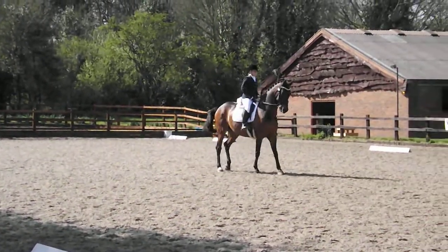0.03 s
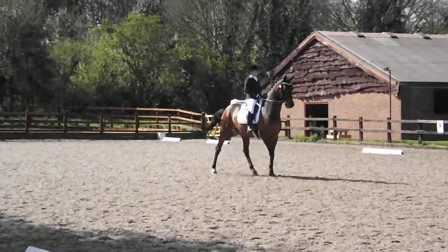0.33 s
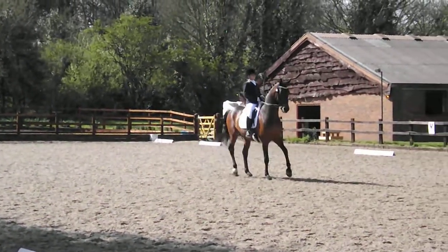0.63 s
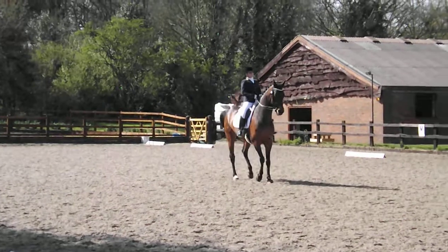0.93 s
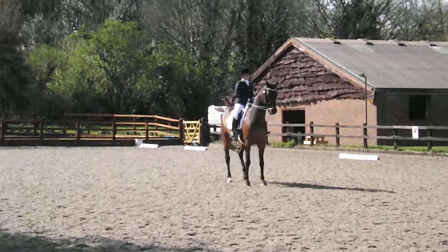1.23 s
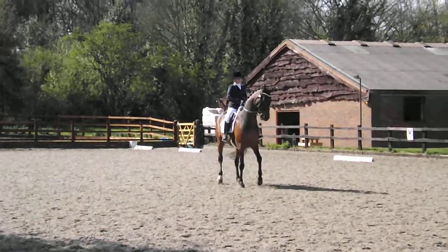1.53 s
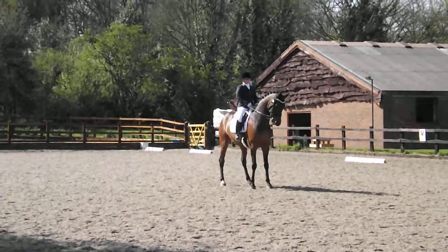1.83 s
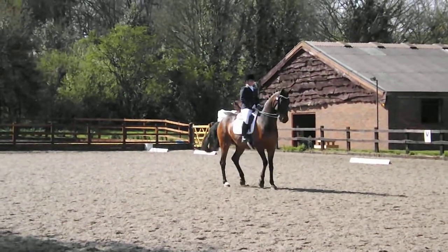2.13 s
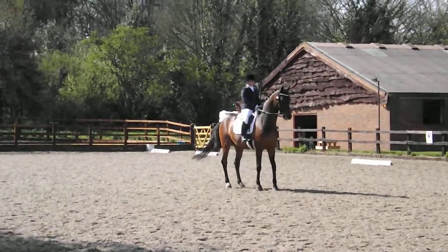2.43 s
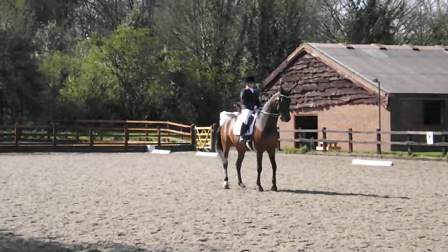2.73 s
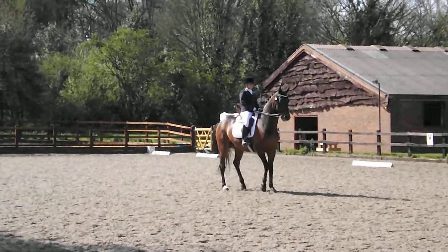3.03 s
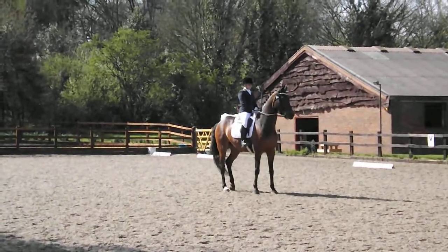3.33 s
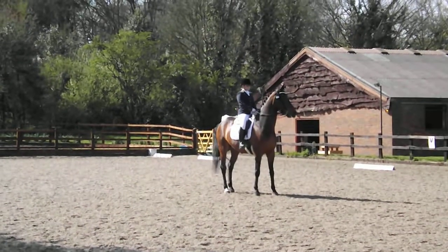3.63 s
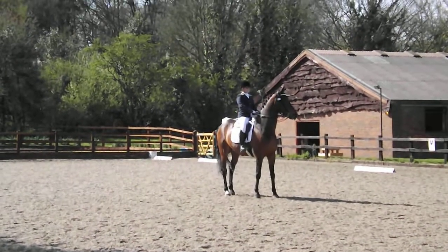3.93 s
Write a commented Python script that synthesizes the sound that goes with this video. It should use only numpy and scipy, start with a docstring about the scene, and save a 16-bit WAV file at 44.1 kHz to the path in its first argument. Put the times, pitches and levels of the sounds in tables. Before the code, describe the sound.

Gusty wind rumbles on the microphone over chirping birds, distant traffic and soft hoof scuffs.

```python
"""An outdoor riding arena edged by trees, on a breezy day; one microphone, out in the wind.
Far traffic and leaves wash on throughout. Small birds chirp in the trees from the start, a distant one
clacks in short runs, thin whistles fall, and a walking horse begins to scuff the sand. Gusts then buffet
the microphone, hardest around two seconds in, with a faint far call before the peak and a tick after it.
As the wind eases the far call comes again, and a run of twitters and a few squeaks close the scene."""
import sys
import numpy as np
from scipy import signal
from scipy.fft import rfft, irfft
from scipy.io import wavfile
from scipy.ndimage import uniform_filter1d

SR = 44100
rng = np.random.default_rng(int(sys.argv[2]) if len(sys.argv) > 2 else 0)


def store_wav(level_fs):
    """Save 16-bit WAV to argv[1]."""
    pcm = np.round(np.clip(np.atleast_2d(level_fs), -1, 1) * 32767)
    wavfile.write(sys.argv[1], SR, pcm.T.astype(np.int16))


N = 176400
TIME = np.arange(N) / SR

# Levels are relative within each table; spectra give level per hertz.
# wind pressure on the microphone: t/s, level/dB
GUST_LEVELS = [(0.0, -38), (0.17, -30.5), (0.33, -34), (0.67, -21.5), (0.69, -16), (0.83, -31),
               (1.01, -22.5), (1.04, -27), (1.2, -21.5), (1.24, -16.5), (1.32, -20), (1.64, -10),
               (1.71, -19), (1.77, -8.5), (1.87, -18.5), (1.92, -10), (2.02, -27), (2.05, -14.5),
               (2.1, -26), (2.15, -14), (2.22, -18.5), (2.27, -16.5), (2.39, -17.5), (2.43, -14.5),
               (2.53, -12), (2.61, -21.5), (2.71, -27), (2.87, -18.5), (2.93, -25), (3.03, -23.5),
               (3.63, -27), (3.97, -22.5), (4.0, -35)]
# rumble of that wind: f/Hz, level/dB
RUMBLE_SPECTRUM = [(10, -2.5), (16, 5), (30, 2.5), (52, -0.5), (80, -8.5), (120, -23.5), (170, -27),
                   (250, -42), (400, -76), (1000, -95), (4000, -130)]
# far traffic and leaves: f/Hz, level/dB
WASH_SPECTRUM = [(20, -2.5), (60, 16), (125, 5.5), (180, -2.5), (280, -8), (400, -5), (700, -7),
                 (1150, -10.5), (1750, -6.5), (1920, -14), (2080, -9), (2600, -15), (3300, -13.5),
                 (3750, -18.5), (4150, -12.5), (4500, -24), (5600, -31.5), (7500, -32), (10000, -34.5),
                 (15500, -36.5)]
# droning bands in the background: f/Hz, width/Hz, level/dB
BACKGROUND_DRONES = [(120, 14.8, -42), (238.5, 64, -53.5), (294.5, 17.6, -57.5), (354.6, 46, -53),
                     (469, 12.7, -56.5), (593.3, 25, -60), (882, 5.9, -65.5), (1502, 10.5, -60.5)]
# rising chirps in the trees: t/s, length/s, start f/Hz, end f/Hz, level/dB
RISING_CHIRPS = [(0.033, 0.035, 2750, 4190, -30), (.132, 0.024, 5050, 5800, -51),
                 (0.15, 0.033, 4130, 4960, -39.5), (0.208, 0.024, 3080, 3930, -36),
                 (0.266, 0.021, 4400, 5680, -43.5), (2.233, 0.059, 3050, 3340, -39.5),
                 (2.52, 0.021, 3220, 4070, -37.5), (2.53, .025, 5030, 5600, -53),
                 (2.55, 0.018, 4300, 4850, -56), (2.565, 0.022, 3127, 3620, -34),
                 (2.626, 0.037, 3110, 4170, -34), (2.716, .024, 4080, 5140, -43),
                 (2.846, 0.011, 3430, 4180, -35), (2.869, 0.041, 3275, 3664, -35.5),
                 (2.917, 0.0235, 3500, 4450, -41), (2.931, 0.042, 3180, 4030, -35),
                 (2.95, 0.029, 5130, 5650, -51), (2.968, .025, 3930, 4750, -46),
                 (3.043, 0.035, 3074, 4170, -30.5), (3.126, .028, 3550, 5180, -39),
                 (3.157, 0.032, 3040, 3436, -37)]
# twitters, each the same run of upsweeps: t/s, level/dB
TWITTER_ONSETS = [(3.273, -27.5), (3.391, -28), (3.503, -27.5), (3.614, -28), (3.732, -28.5)]
# upsweeps of one twitter: delay/s, length/s, start f/Hz, end f/Hz, level/dB
TWITTER_SWEEPS = [(0, 0.0173, 3015, 4514, -5.5), (0.02, 0.0098, 3060, 4110, -8),
                  (.027, .014, 4500, 5200, -14), (0.044, 0.015, 4660, 6700, -23)]
# dry clacks of a distant bird: t/s, level/dB, centre f/Hz
BIRD_CLACKS = [(0.223, -35, 1300), (0.328, -32, 1230), (0.417, -30.5, 1260), (0.532, -32, 1200),
               (0.643, -32, 1200), (1.071, -31.5, 1200), (1.163, -30, 1200), (1.275, -26, 1140),
               (1.335, -28.5, 1150), (3.339, -31, 1170), (3.445, -28.5, 1265), (3.536, -30.5, 1500),
               (3.649, -30.5, 1200)]
# colour of one clack: f/centre f, level/dB
CLACK_SPECTRUM = [(.42, -7), (.75, -5), (1, 2), (1.4, -3.5), (1.95, -5.5), (2.7, -27), (5, -29), (10, -60)]
# falling whistles: t/s, length/s, level/dB, scattered share/0-1, share of the course sung/0-1
FALLING_WHISTLES = [(0.297, 0.066, -54, .2, 0.75), (1.07, .05, -56, .7, 0.94), (1.349, 0.059, -52, .4, .55),
                    (2.118, 0.058, -47, 0.2, 0.93), (2.291, .067, -43, 0.03, 0.95),
                    (3.439, 0.059, -48, 0.5, 0.9), (3.607, 0.057, -44, 0.45, 0.91)]
# full course of a whistle: position/0-1, f/Hz, level/dB
WHISTLE_COURSE = [(0, 7150, -25), (.3, 6470, -10.5), (.55, 6160, -11), (.83, 5880, -0.5), (.93, 5010, 7),
                  (1, 4400, -24)]
# hooves on the arena floor: t/s, hold/s, release/s, hiss level/dB, ring level/dB
HOOF_SCUFFS = [(0.463, 0.16, 0.13, -41.5, -42.5), (0.7, 0.26, 0.09, -48, -50),
               (1.24, 0.18, 0.078, -47, -55), (1.725, 0.11, 0.14, -41, -46.5),
               (2.214, 0.15, 0.44, -46, -50), (2.983, 0.14, 0.045, -44.5, -45)]
# hiss of the sand: f/Hz, level/dB
SAND_SPECTRUM = [(100, -51), (700, -1.5), (1500, -11), (2200, -5), (2800, -3), (3300, -3.5), (3800, -6),
                 (4400, -13.5), (5600, -24), (8000, -39), (14000, -46)]
# sharp buffets right at the microphone: t/s, width/s, level/dB
WIND_BUFFETS = [(.704, .0045, -16), (.713, .0027, -19.5), (1.0, .004, -18), (1.413, .0013, -22),
                (1.624, .004, -16), (1.771, .0032, -13), (1.793, .0014, -18), (1.81, .0025, -21),
                (1.904, .0019, -13), (2.274, .0032, -13.5), (2.375, .0019, -25), (2.427, .0025, -19),
                (2.508, .0021, -14), (2.567, .002, -17.5), (2.587, .0026, -18.5), (2.925, .0012, -27),
                (3.005, .0014, -27), (3.093, .0022, -17), (3.78, .0017, -26), (3.797, .006, -21)]
# faint calls, far off: t/s, f/Hz, level/dB
FAR_NOTES = [(1.245, 750, -45.5), (3.23, 745, -48)]
# squeaks and slurs: t/s, length/s, start f/Hz, end f/Hz, level/dB, roughness/0-1, scattered share/0-1
BIRD_SQUEAKS = [(3.46, .055, 3300, 2850, -43, .08, .5), (3.785, .075, 3200, 4100, -47, .08, .5),
                (3.86, .04, 8400, 8150, -48, .01, .08), (3.866, .04, 6000, 5000, -52, .12, .3),
                (3.877, .06, 6750, 6650, -49.5, .022, .1), (3.892, .013, 6950, 6720, -35, .007, .01),
                (3.899, .027, 8450, 7600, -45, .009, .05), (3.895, .06, 4300, 3950, -42, .12, .5),
                (3.9, .07, 2700, 2500, -46, .1, .4), (3.93, .11, 4100, 3600, -39.5, .12, .5)]


def from_db(db):
    """Decibels to gain."""
    return 10 ** (np.asarray(db) / 20)


def rms_one(x):
    """Scale to unit rms."""
    return x / np.sqrt(np.mean(x ** 2) + 1e-20)


def evened(x, span_s):
    """Hold the running level of a noise at 1."""
    return x / np.sqrt(np.abs(uniform_filter1d(x ** 2, int(span_s * SR))) + 1e-12)


def drift(rate_hz):
    """Smooth random wandering of spread 1."""
    step, settle = 40, 2000
    pole = np.exp(-2 * np.pi * rate_hz * step / SR)
    noise = rng.standard_normal(N // step + settle + 2)
    slow = signal.lfilter([1], [1, -2 * pole, pole ** 2], noise)[settle:]
    return np.interp(np.arange(N) / step, np.arange(len(slow)), rms_one(slow))


def coloured(spectrum, flicker_db=0, size=N):
    """Noise in the colour of a spectrum, rms 1; octaves below about 2 kHz can each flicker."""
    hz, db = np.transpose(spectrum)
    bin_hz = np.maximum(np.arange(size // 2 + 1) * SR / size, 1)
    shaped = rfft(rng.standard_normal(size)) * from_db(np.interp(np.log(bin_hz), np.log(hz), db))
    if not flicker_db:
        return rms_one(irfft(shaped, size))
    octave, out = np.log2(bin_hz).astype(int), np.zeros(size)
    for k in np.unique(octave):
        flicker = from_db(flicker_db * drift(10.4) * (2 ** k < 2000))
        out += flicker * irfft(shaped * (octave == k), size)
    return rms_one(out)


def resonant_noise(hz, width_hz):
    """Noise twice through one resonance, rms 1."""
    radius = np.exp(-np.pi * width_hz / SR)
    x = rng.standard_normal(N + SR // 2)
    for _ in range(2):
        x = signal.lfilter([1, 0, -1], [1, -2 * radius * np.cos(2 * np.pi * hz / SR), radius ** 2], x)
    return rms_one(x[-N:])


def add(out, s, sound):
    """Mix a sound in at a time."""
    i = max(int(s * SR), 0)
    out[i:i + len(sound)] += sound[:max(N - i, 0)]


def wind(split_hz=21.6, brightening=0.082):
    """Eddies on the microphone; the small ones gain in stronger gusts and brighten the rumble."""
    gust_db = np.interp(TIME, *np.transpose(GUST_LEVELS))
    rumble = coloured(RUMBLE_SPECTRUM)
    large = signal.sosfiltfilt(signal.butter(2, split_hz, fs=SR, output="sos"), rumble)
    small = (rumble - large) * from_db(brightening * (gust_db - 24))
    return from_db(gust_db - 1.5) * evened(large + small, span_s=0.07)


def traffic_and_leaves():
    """A far, slightly flickering wash, with steady droning bands."""
    wash = from_db(-37) * coloured(WASH_SPECTRUM, flicker_db=0.83)
    return wash + sum(from_db(db) * resonant_noise(hz, width) for hz, width, db in BACKGROUND_DRONES)


def glide(length, start_hz, end_hz, db, arch, roughness=0.009):
    """A bird's note swells and fades as it sweeps; with arch above 1 the sweep levels off."""
    progress = np.linspace(0, 1, int(length * SR))
    hz = end_hz + (start_hz - end_hz) * (1 - progress) ** arch
    hz *= 1 + roughness * drift(310)[:len(hz)]
    return from_db(db) * np.sin(np.pi * progress) * np.sin(2 * np.pi * np.cumsum(hz) / SR)


def songbirds(flutter_db=1):
    """Slightly hoarse chirps and twitters from the trees at the arena's edge."""
    out = np.zeros(N)
    for s, length, start_hz, end_hz, db in RISING_CHIRPS:
        add(out, s, glide(length, start_hz, end_hz, db, arch=1.31))
    for s, db in TWITTER_ONSETS:
        for delay, length, start_hz, end_hz, sweep_db in TWITTER_SWEEPS:
            add(out, s + delay, glide(length, start_hz, end_hz, db + sweep_db, arch=1.67))
    return out * from_db(-6 + flutter_db * drift(120))


def echo(x, t60_s, delay_s=0):
    """Diffuse echo from trunks, branches and the barn."""
    age = TIME[:SR]
    tail = rng.standard_normal(SR) * from_db(-60 * age / t60_s) * (age > delay_s)
    return signal.fftconvolve(x, tail / np.sqrt(np.sum(tail ** 2)))[:N]


def scattered_by_branches(x, share):
    """A share of the power reaches the microphone smeared by twigs and leaves."""
    return np.sqrt(1 - share) * x + np.sqrt(share) * echo(x, t60_s=0.22)


def clacks(rise_s=0.0027, hold_s=0.0065, decay_s=0.0071):
    """A distant bird's hard-edged bursts, about ten a second within a run."""
    out, age = np.zeros(N), TIME[:SR // 10]
    envelope = np.clip(age / rise_s, 0, 1) * np.exp(-np.maximum(age - hold_s, 0) / decay_s)
    for s, db, centre_hz in BIRD_CLACKS:
        spectrum = [(centre_hz * multiple, level_db) for multiple, level_db in CLACK_SPECTRUM]
        noise = evened(coloured(spectrum, size=len(age)), hold_s)
        add(out, s, from_db(db - 8.5) * envelope * noise)
    return out


def whistles(waver=0.0058):
    """Thin falling whistles; those sung nearly in full end in a downward hook."""
    out = np.zeros(N)
    position, course_hz, course_db = np.transpose(WHISTLE_COURSE)
    for s, length, db, scattered, sung in FALLING_WHISTLES:
        progress = np.linspace(0, sung, int(length * SR))
        hz = np.interp(progress, position, course_hz) * (1 + waver * drift(115)[:len(progress)])
        envelope = from_db(db + np.interp(progress, position, course_db))
        envelope *= signal.windows.tukey(len(progress), 0.1)
        note = np.zeros(N)
        add(note, s, envelope * np.sin(2 * np.pi * np.cumsum(hz) / SR))
        out += scattered_by_branches(note, scattered)
    return out


def hooves(attack_s=0.017, grain_db=2):
    """Each scuff throws a gritty hiss of sand with a ringing core, and trickles away."""
    hiss_power = ring_power = 0
    for s, hold, release, hiss_db, ring_db in HOOF_SCUFFS:
        age = TIME - s
        envelope = np.clip(age / attack_s, 0, 1) * np.exp(-np.maximum(age - hold, 0) / release)
        hiss_power += (from_db(hiss_db) * envelope) ** 2
        ring_power += (from_db(ring_db - 6.5) * envelope) ** 2
    hiss = rms_one(coloured(SAND_SPECTRUM) * from_db(grain_db * drift(180)))
    ring = evened(resonant_noise(hz=3265, width_hz=400), span_s=0.028)
    return np.sqrt(hiss_power) * hiss + np.sqrt(ring_power) * ring


def buffets():
    """A lone vortex pushes, then sucks at the microphone; the smaller it is, the higher the thump."""
    out = np.zeros(N)
    for s, width, db in WIND_BUFFETS:
        passage = (TIME - s) / width
        out -= from_db(db) * passage * np.exp(0.5 * (1 - passage ** 2))
    return out


def far_calls(spread_s=0.023):
    """Short hoarse notes from far off, barely above the wash."""
    out = np.zeros(N)
    for s, hz, db in FAR_NOTES:
        swell = np.exp(-0.5 * ((TIME - s) / spread_s) ** 2)
        out += from_db(db) * swell * resonant_noise(hz, width_hz=140)
    return out


def tick(start_s=2.606, decay_s=0.002):
    """One small, sharp tick of bright noise."""
    envelope = (TIME > start_s) * np.exp(-np.abs(TIME - start_s) / decay_s)
    return from_db(-40.5) * envelope * resonant_noise(hz=5200, width_hz=2000)


def squeaks():
    """Thin squeaks near the microphone, and raspy slurs from deeper in the trees."""
    out = np.zeros(N)
    for s, length, start_hz, end_hz, db, roughness, scattered in BIRD_SQUEAKS:
        note = np.zeros(N)
        add(note, s, glide(length, start_hz, end_hz, db, arch=0.9, roughness=roughness))
        out += scattered_by_branches(note, scattered)
    return out


def scene(wind_ceiling=0.62):
    """At the microphone: calls and a tick with their echo, horse, far wash, wind with rounded peaks."""
    calls = scattered_by_branches(songbirds(), share=0.27)
    calls += squeaks() + whistles() + clacks() + far_calls() + tick()
    pressure = wind_ceiling * np.tanh((wind() + buffets()) / wind_ceiling)
    tree_echo = from_db(-10) * echo(calls, t60_s=0.67, delay_s=0.014)
    return (calls + tree_echo + hooves() + traffic_and_leaves() + pressure)[None]


def record(dry, peak_hz=3297, width_hz=380, peak_db=7.5, cutoff_hz=15700):
    """The microphone has a narrow resonance in the upper midrange; the top is cut steeply."""
    ring = signal.lfilter(*signal.iirpeak(peak_hz, peak_hz / width_hz, fs=SR), dry)
    heard = dry + (from_db(peak_db) - 1) * ring
    return signal.sosfilt(signal.ellip(12, 0.1, 80, cutoff_hz, fs=SR, output="sos"), heard)


dry = scene()
out = record(dry)
store_wav(out)
```